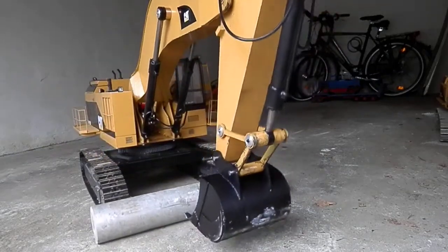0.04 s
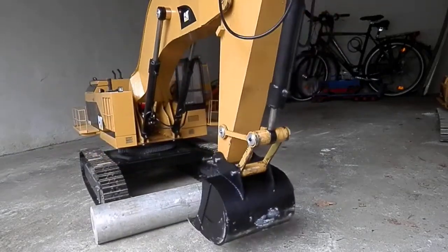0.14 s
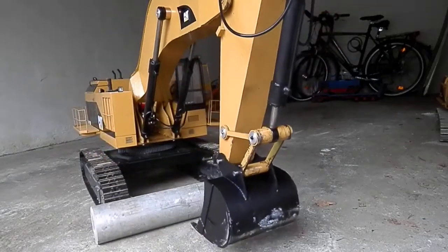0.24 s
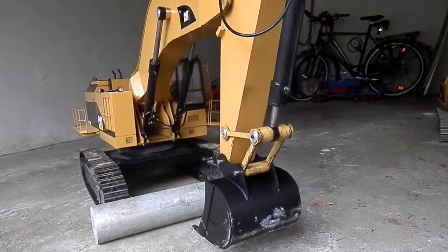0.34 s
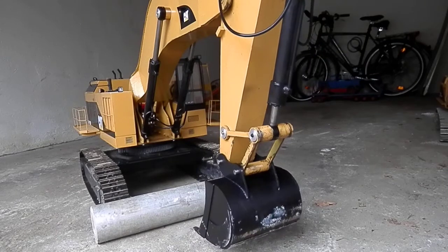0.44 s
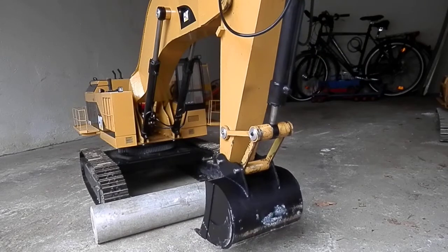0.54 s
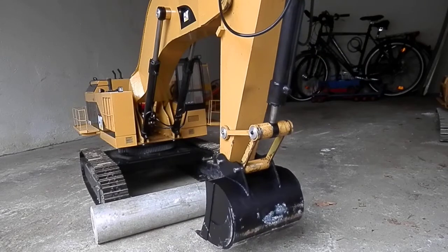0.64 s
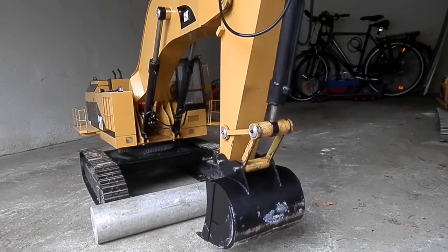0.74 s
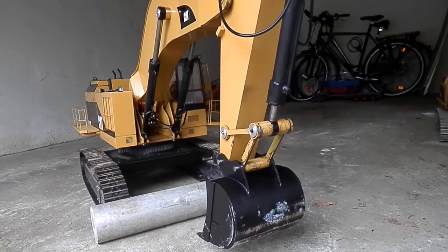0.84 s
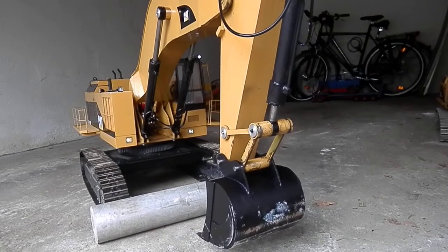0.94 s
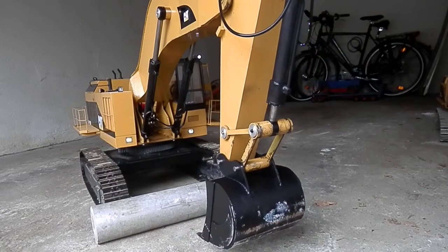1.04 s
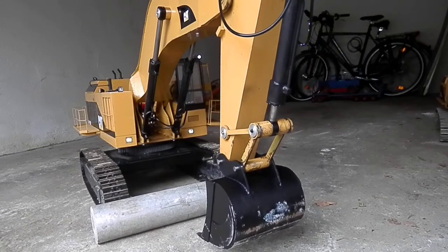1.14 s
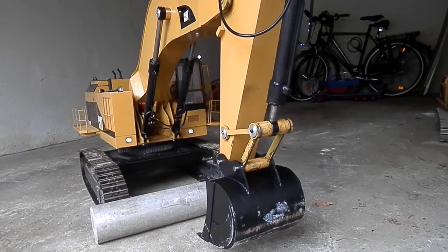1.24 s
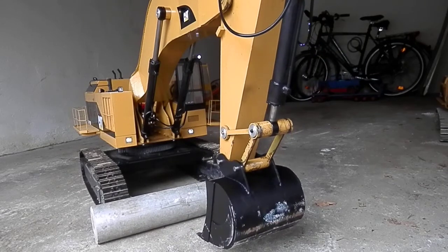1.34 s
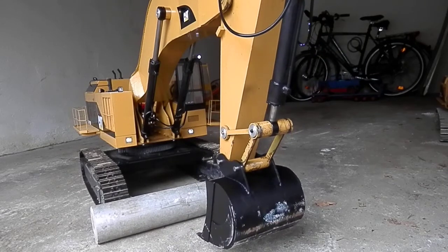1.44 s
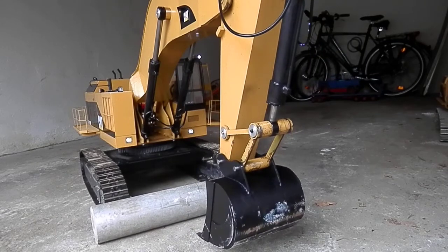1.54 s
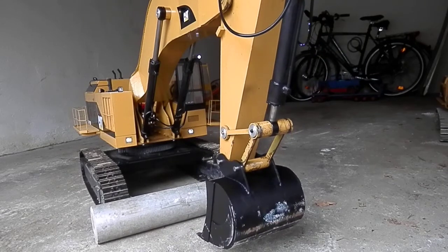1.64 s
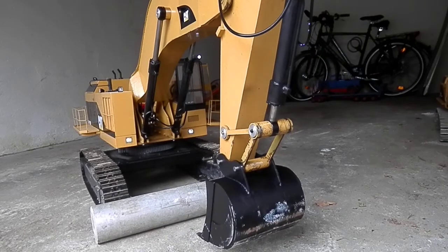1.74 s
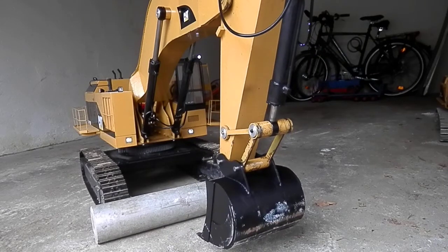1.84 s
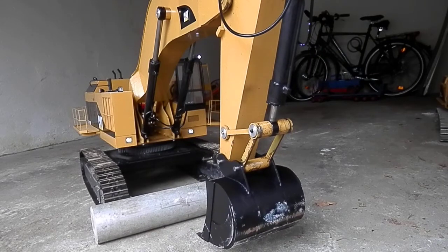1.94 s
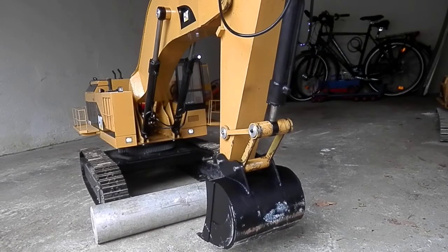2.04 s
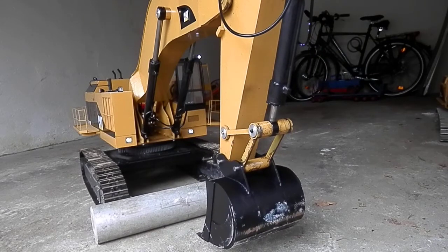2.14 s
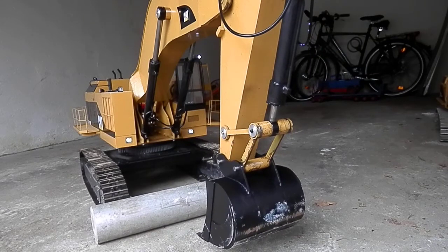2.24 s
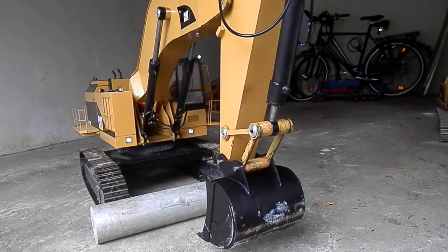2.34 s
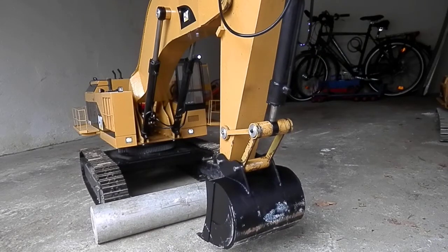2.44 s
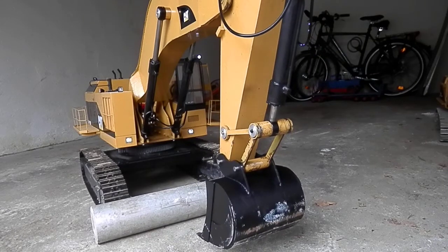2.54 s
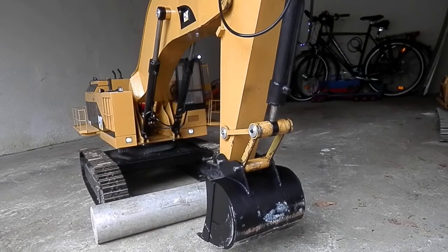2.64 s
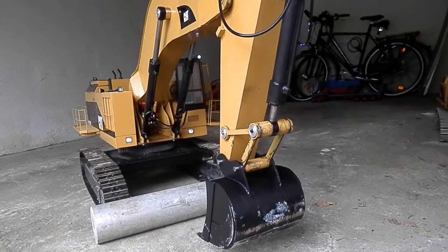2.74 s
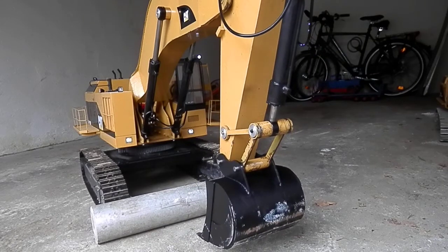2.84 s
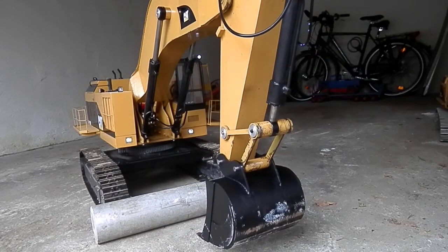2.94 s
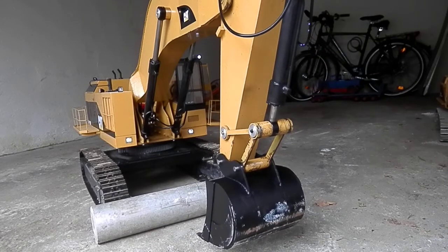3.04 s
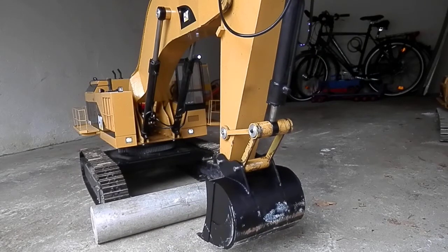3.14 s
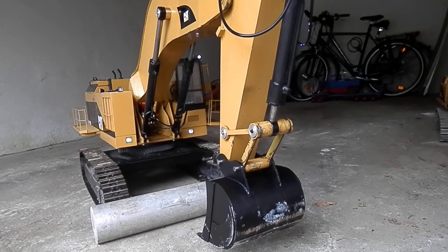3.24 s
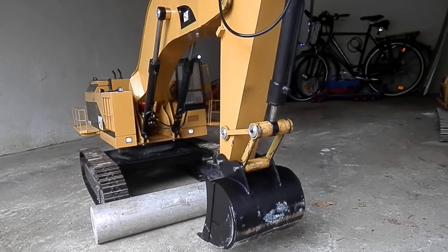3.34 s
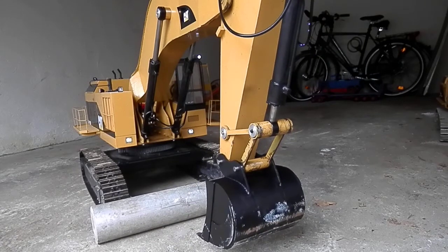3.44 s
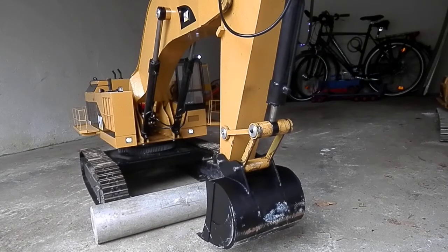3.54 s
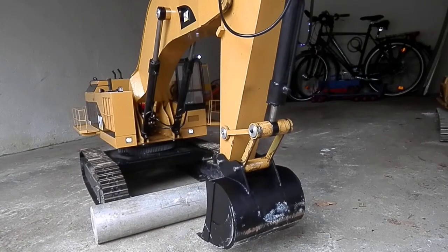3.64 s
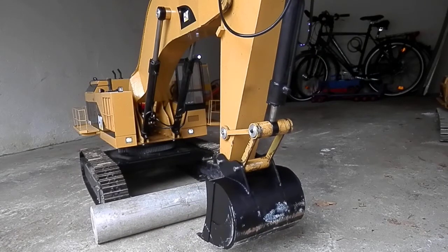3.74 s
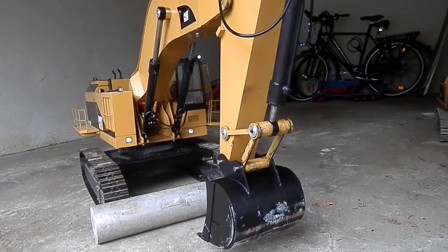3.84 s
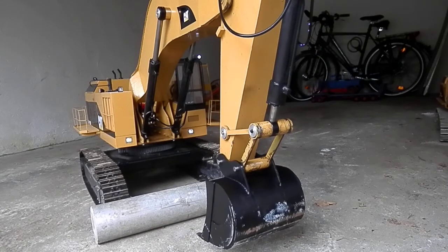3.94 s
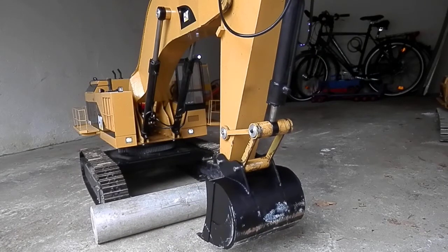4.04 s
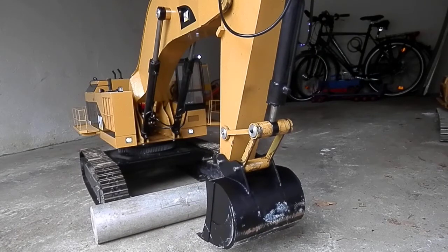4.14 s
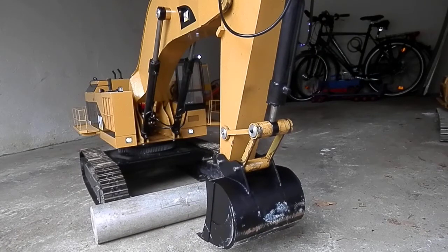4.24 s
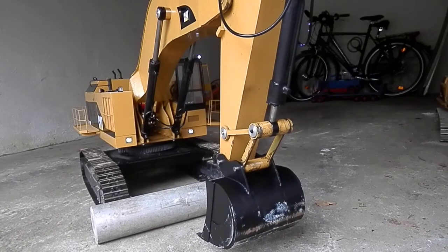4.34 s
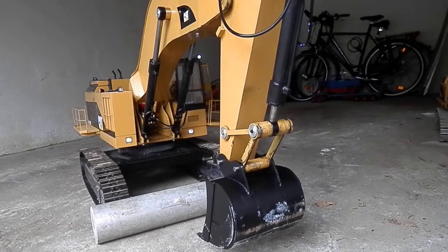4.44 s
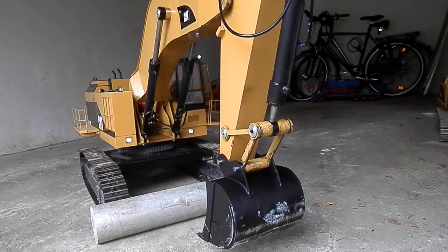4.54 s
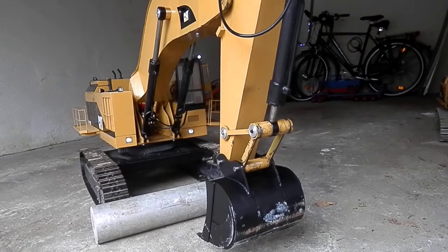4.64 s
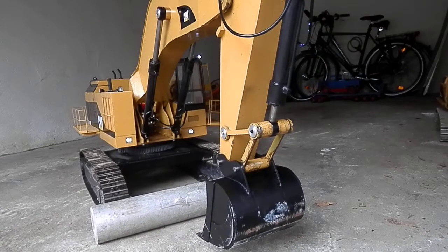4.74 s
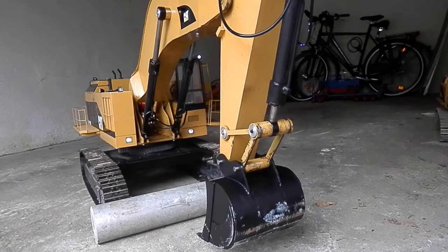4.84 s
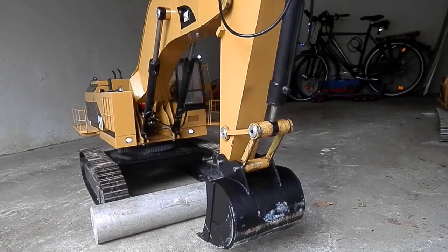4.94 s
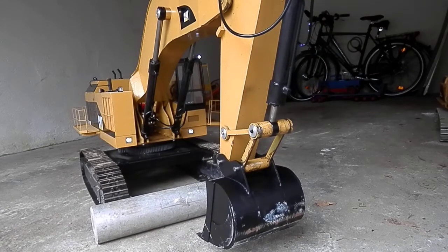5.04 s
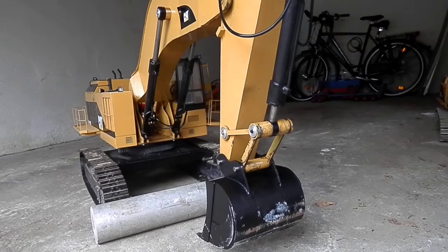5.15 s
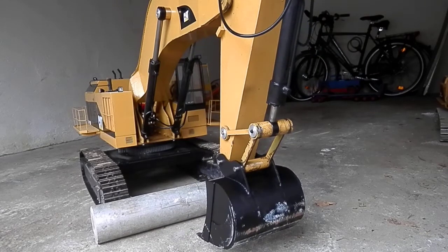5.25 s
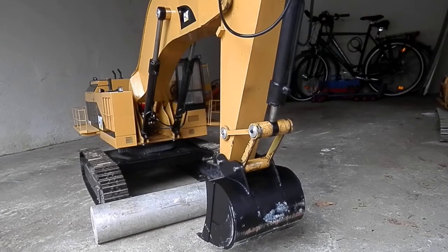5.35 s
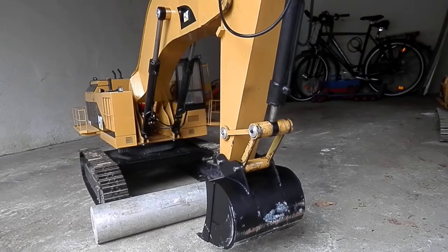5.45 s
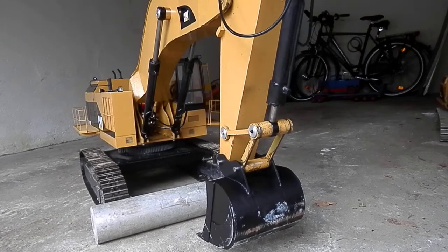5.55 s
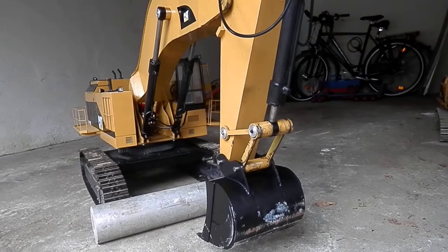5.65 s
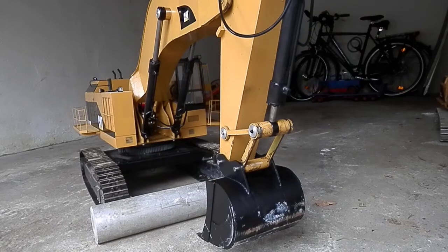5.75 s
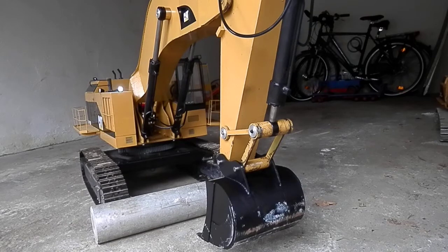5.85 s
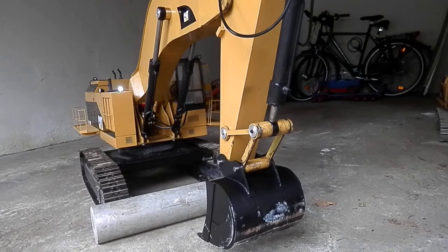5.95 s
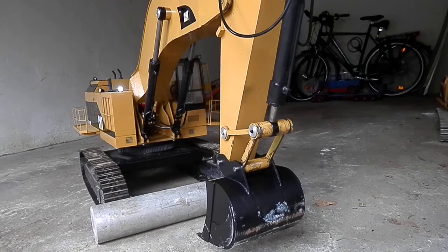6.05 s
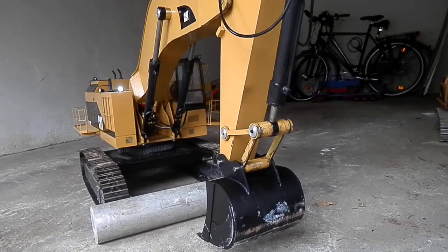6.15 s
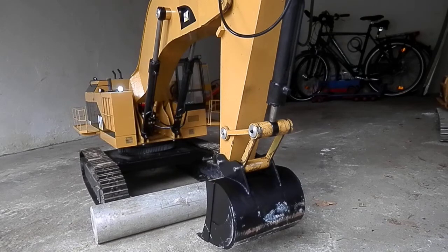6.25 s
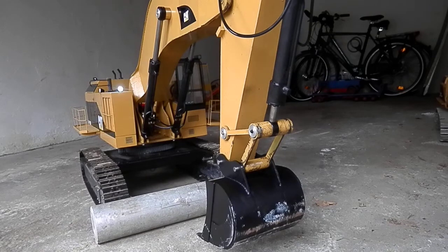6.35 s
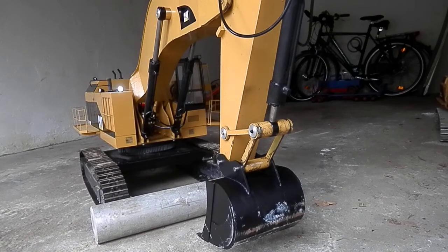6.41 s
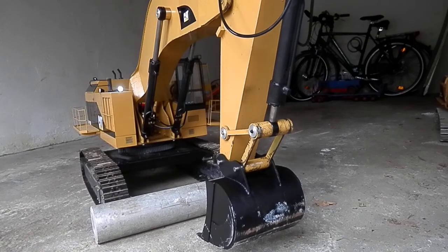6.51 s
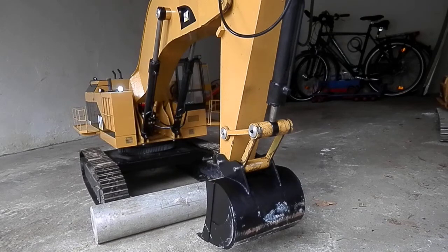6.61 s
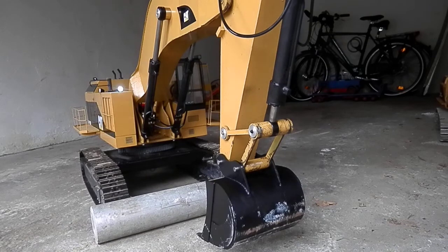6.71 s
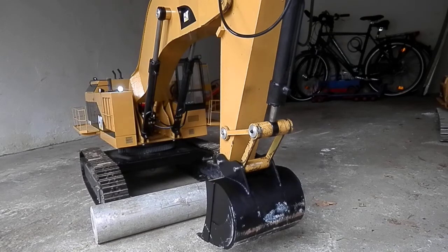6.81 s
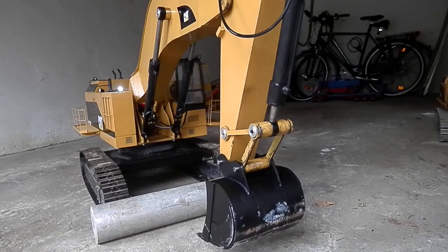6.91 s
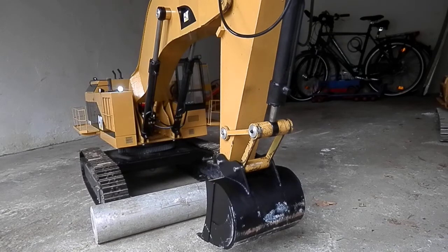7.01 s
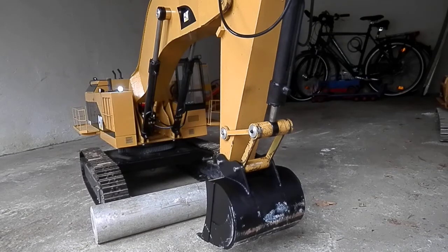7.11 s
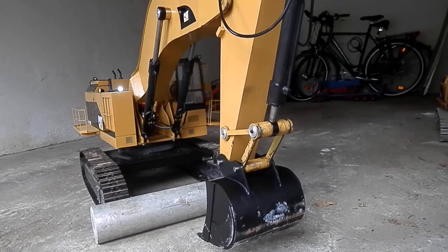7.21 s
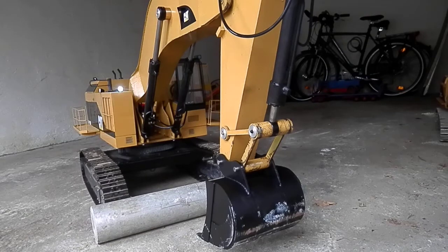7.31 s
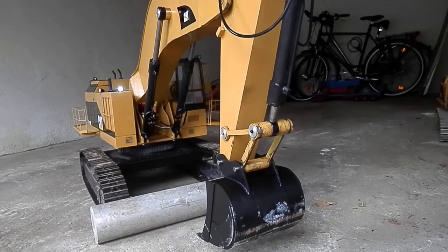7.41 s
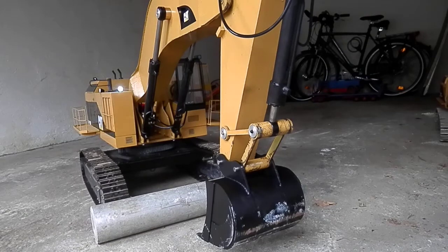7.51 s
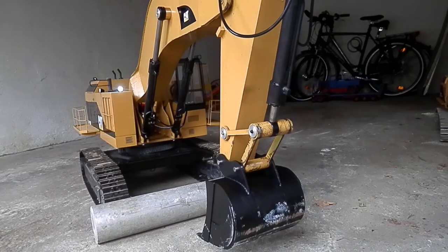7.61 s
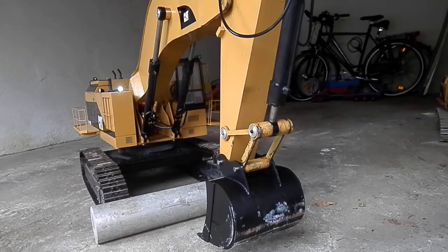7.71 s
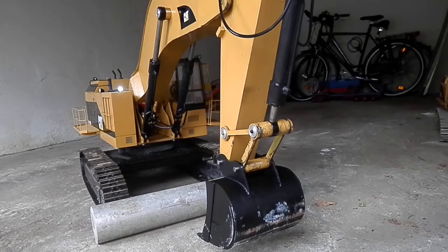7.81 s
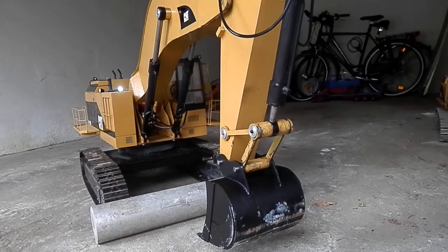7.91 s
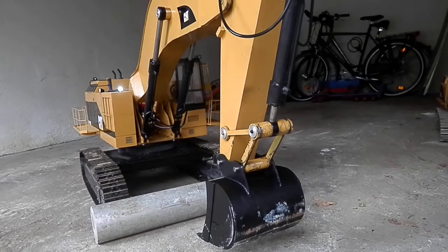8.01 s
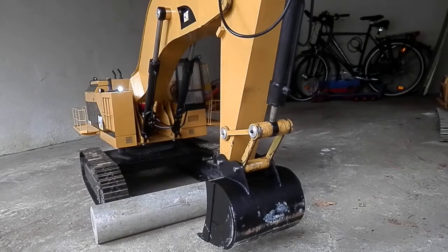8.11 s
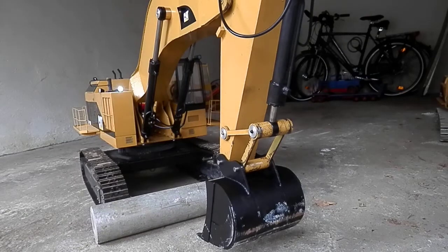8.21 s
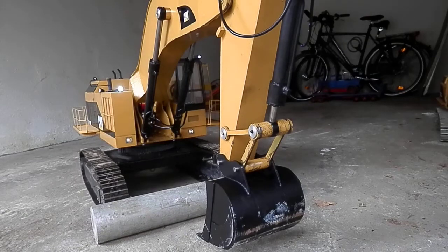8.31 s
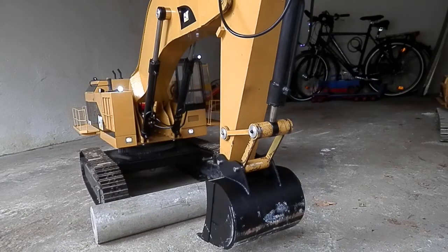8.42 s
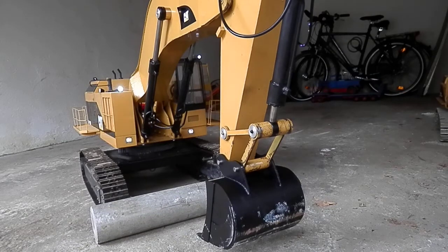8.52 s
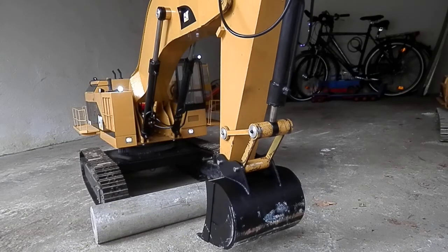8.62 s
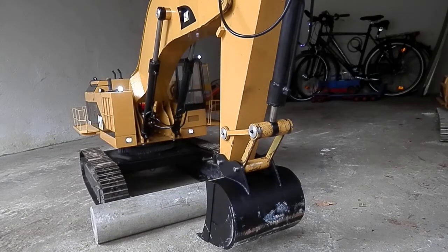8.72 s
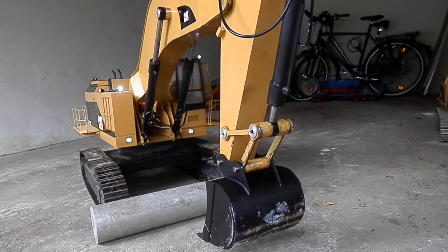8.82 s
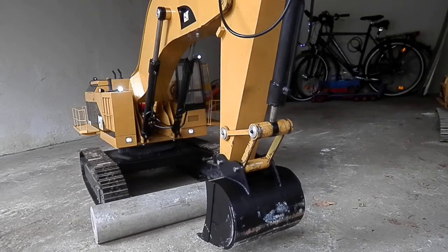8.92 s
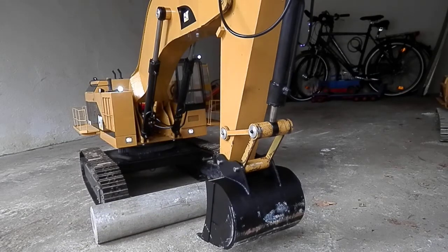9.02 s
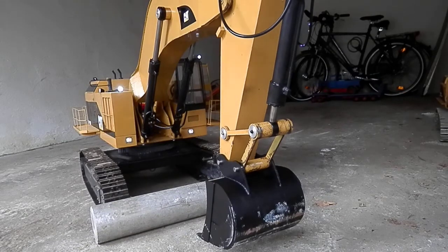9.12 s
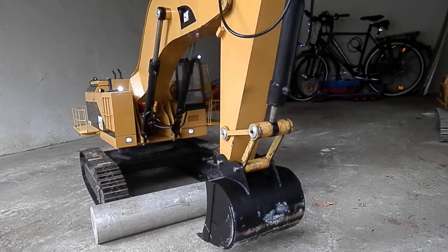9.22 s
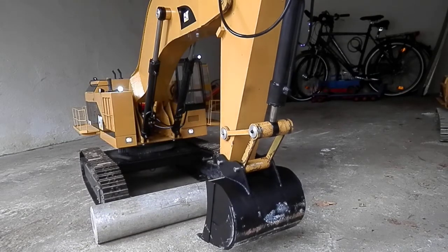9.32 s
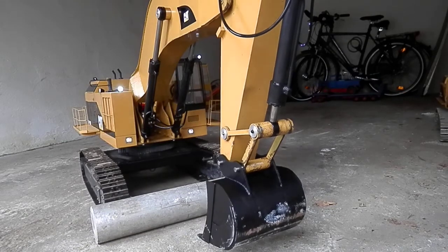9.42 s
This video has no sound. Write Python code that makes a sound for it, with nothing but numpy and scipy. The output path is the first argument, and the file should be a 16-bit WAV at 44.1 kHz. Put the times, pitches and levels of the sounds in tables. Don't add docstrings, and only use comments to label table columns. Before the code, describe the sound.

In a bare concrete garage, a model excavator's electric pump whines and rattles loudly, sags under load, rings hollowly and glides down to rest within two seconds. A small fan rises slightly in pitch and hums on steadily. Distant birds chirp faintly, then switches click and shoes scuff. A soft deep knock comes later, and controller hiss and a thin tone return at the end. Close microphone, light reverberation.

```python
import sys
import numpy as np
from scipy import signal
from scipy.fft import rfft, irfft, next_fast_len
from scipy.io import wavfile

SR = 44100
rng = np.random.default_rng(int(sys.argv[2]) if len(sys.argv) > 2 else 0)


def wav_out(sig):
    wavfile.write(sys.argv[1], SR, np.round(np.clip(np.atleast_2d(sig).T, -1, 1) * 32767).astype(np.int16))


def ratio(d):
    e = np.asarray(d, float) / 20
    return 10 ** e


N = 417627
TIME = np.arange(N) / SR
LOADED_HZ = 1043
FIELD = 1.088
WAKE_S, TURN_S = 9.14, 9.425
# (frequency [Hz], level [dB])
CAPSULE = [(300, 7.5), (2200, -2), (3700, -5), (5200, -4), (7200, 1), (9000, -1.5), (10500, -14.5),
           (12500, -15), (15200, -7.5)]


def in_time(rows):
    s, *columns = np.transpose(rows)
    return [np.interp(TIME, s, c) for c in columns]


def ramp(start_s, length_s):
    return np.clip((TIME - start_s) / length_s, 0, 1)


def rms_one(x):
    return x / np.sqrt(np.mean(x ** 2) + 1e-20)


def wander(rate_hz, size=N):
    r = np.exp(-2 * np.pi * rate_hz / SR)
    settle = 20000
    white = rng.standard_normal(size + settle)
    return rms_one(signal.lfilter([1], [1, -2 * r, r * r], white)[settle:])


def level_at(spectrum, at_hz):
    hz, db = np.transpose(spectrum)
    return np.interp(np.log(np.maximum(at_hz, 1)), np.log(hz), db)


def shaped(x, spectrum):
    size = next_fast_len(len(x))
    gain = ratio(level_at(spectrum, np.fft.rfftfreq(size, 1 / SR)))
    return irfft(rfft(x, size) * gain, size)[:len(x)]


def coloured(spectrum, size=N):
    return rms_one(shaped(rng.standard_normal(size), spectrum))


def resonate(x, hz, width_hz):
    r = np.exp(-np.pi * width_hz / SR)
    numerator = np.array([1, 0, -1]) * (1 - r * r) / 2
    return signal.lfilter(numerator, [1, -2 * r * np.cos(2 * np.pi * hz / SR), r * r], x)


def tone(hz, rough=0., rough_hz=60, flutter_db=0., flutter_hz=15):
    size = len(hz)
    phase = 2 * np.pi * (np.cumsum(hz) / SR + rng.random())
    skirt = wander(rough_hz, size) * np.sin(phase) + wander(rough_hz, size) * np.cos(phase)
    flutter = ratio(flutter_db * wander(flutter_hz, size))
    return flutter * (np.sqrt(2) * np.sin(phase) + rough * skirt)


def frame(x, through_db):
    # (frequency [Hz], width [Hz], level [dB])
    modes = [(795, 35, 1), (1090, 90, 0), (1480, 60, -1), (2090, 120, -6), (2420, 110, 1), (3900, 200, -10),
             (4400, 120, -5), (5600, 200, -7), (6600, 500, -12), (7500, 500, -8)]
    out = ratio(through_db) * x
    for k, (hz, width_hz, db) in enumerate(modes):
        out = out + (-1) ** k * ratio(db) * resonate(x, hz, width_hz)
    return out


def hush():
    # (frequency [Hz], density [dB per Hz])
    density = [(1200, -27.5), (2000, -6), (2500, -3.5), (2900, -10), (3500, -18), (4300, -10), (5250, -16),
               (6000, -10), (7300, -8), (8600, -16), (9300, -41.5), (12000, -42), (13400, -15.5),
               (15700, -8.5)]
    noise, edges = coloured(density), np.geomspace(1000, 16000, 15)
    out = np.zeros(N)
    for k, pair in enumerate(zip(edges, edges[1:])):
        band = signal.sosfilt(signal.butter(2, pair, "band", fs=SR, output="sos"), noise)
        out += (-1) ** k * band * ratio(1.1 * wander(3.5))
    return ratio(-74) * out


def birds():
    # (time [s], length [s], start frequency [Hz], end frequency [Hz], level [dB])
    calls = [(2.03, .12, 4400, 4380, -82), (2.13, .14, 4250, 4350, -81), (2.35, .07, 3900, 3950, -85),
             (2.54, .18, 4300, 4400, -78), (2.86, .05, 4210, 4200, -80), (2.95, .2, 4400, 4500, -81),
             (3.05, .2, 4650, 4700, -82), (4.2, .12, 7500, 7200, -85), (5.55, .13, 4500, 4500, -85),
             (5.88, .16, 5100, 5700, -86), (6.29, .12, 4550, 4600, -85), (6.9, .16, 4600, 4500, -81),
             (7.41, .09, 6500, 6950, -73), (7.62, .16, 6600, 6500, -77)]
    out = np.zeros(N)
    for s, length, start_hz, end_hz, db in calls:
        size, at = round(length * SR), round(s * SR)
        glide_hz = np.linspace(start_hz, end_hz, size)
        whistle = tone(glide_hz, rough=2.0, rough_hz=120, flutter_db=3.5)
        out[at:at + size] += ratio(db) * np.hanning(size) ** .4 * whistle
    return out


def fan():
    blades = 7
    # (time [s], blade rate [Hz])
    speed = [(0, 198.2), (1.3, 199.6), (1.8, 212.2), (2.08, 220.3), (2.3, 223.9), (2.64, 227.4),
             (3.5, 228.8), (7, 230.2)]
    # (frequency [Hz], level [dB])
    housing = [(211, -48), (216, -38.5), (220, -31), (224, -35.5), (228.5, -35), (230, -34.5)]
    # (multiple of the shaft rate, level [dB])
    shaft = [(1, -58), (2, -57.5), (4, -59), (6, -68), (8, -49.5), (10, -64.5), (14, -66), (16, -64.5),
             (21, -64), (33, -72)]
    # (frequency [Hz], density [dB per Hz])
    air = [(12, -53.5), (20, -20), (59, -9.5), (163, -22.5), (202, -14), (230, -11), (251, -15.5),
           (279, -13), (332, -19.5), (663, -24), (841, -34.5), (1070, -38), (1270, -43), (2130, -54.5),
           (3500, -61.5), (4550, -92.5), (7700, -120)]
    blade_hz, = in_time(speed)
    blade_db = level_at(housing, blade_hz)
    out = ratio(blade_db) * tone(blade_hz, rough=.12, rough_hz=6, flutter_db=.7, flutter_hz=1.5)
    for multiple, db in shaft:
        out += ratio(db) * tone(multiple * blade_hz / blades, rough=0.24, rough_hz=4.0)
    return out + ratio(-43.5 + 0.44 * wander(3.4)) * coloured(air)


def rings():
    # (time [s], frequency [Hz], peak level [dB], decay time T60 [s])
    blows = [
        (0, 277.6, -27, 0.48),
        (0, 1480, -28.5, 0.52),
        (1.2, 810, -22.5, .2),
        (0.64, 457.4, -21.5, .3),
        (.604, 533, -24, 0.16),
        (0.66, 685, -26, 0.089),
        (7.5, 350, -40, 0.068),
        (7.5, 69, -32.5, 0.71),
        (7.5, 120, -40, 0.36),
        (9.42, 542, -40, 0.3),
    ]
    out = np.zeros(N)
    for s, hz, db, t60 in blows:
        age = np.maximum(TIME - s, 0)
        onset = np.minimum(age * hz / 2.4, 1)
        out += ratio(db - 60 * age / t60) * onset * np.sin(2 * np.pi * hz * age)
    return out


def scuffs():
    # (time [s], length [s], level [dB], centre frequency [Hz], width [octaves])
    slides = [(4.982, 0.11, -54.5, 3940, 4.1), (5.082, .12, -55, 3860, 3.9),
              (5.387, 0.038, -50.5, 660, 0.79), (5.385, 0.085, -57, 3000, 4.9),
              (5.493, 0.026, -58.5, 3500, 2.0), (5.522, .07, -66, 1800, 6.1),
              (6.455, 0.018, -54, 1090, 0.98), (5.02, 0.17, -63, 2380, 0.69), (5.754, .05, -70, 7500, 0.81),
              (7.508, 0.043, -39.5, 583, 0.98), (7.51, 0.082, -50, 3992, 12), (7.57, 0.053, -60, 580, 0.74),
              (7.866, 0.016, -50.5, 500, 1.1), (7.87, .03, -61.5, 5203, 1.0),
              (7.972, 0.065, -66, 2570, 2.6), (8.284, 0.051, -63.5, 6500, 3.2),
              (8.725, 0.028, -57, 586, 2.2), (8.74, .1, -67.5, 7370, 1)]
    out, size = np.zeros(N), 2 ** 13
    for s, length, db, hz, octaves in slides:
        age = TIME[:size] / length
        shape = np.minimum(age / .12, 1) * ratio(-25 * np.maximum(age - .7, 0))
        band = [(hz / 16 ** octaves, -48), (hz, 0), (hz * 16 ** octaves, -48)]
        at = round(s * SR)
        out[at:at + size] += ratio(db + 3.2 * wander(120, size)) * shape * coloured(band, size)
    return out


def clicks():
    # (time [s], peak level [dB], pitch [Hz], share of 500-1500 Hz [dB])
    taps = [(4.9876, -44.5, 6900, -4), (5.2928, -40, 6750, -4), (5.3781, -43.5, 1910, 7.5),
            (5.4285, -43, 1820, -1), (5.4934, -32.5, 1950, -11), (5.5164, -49, 1930, -13.5),
            (5.66, -53, 2060, 8), (5.7682, -39.5, 6820, -9), (6.039, -35.5, 6770, -9.5),
            (7.5058, -39, 1910, 4.5), (7.5454, -47, 6060, 7.5), (7.874, -48, 1990, -3),
            (7.955, -38.5, 2200, -14), (8.234, -50, 7180, -2), (8.263, -44, 2580, -6.5),
            (8.574, -46, 5400, 0), (8.732, -41, 8040, -5), (8.9892, -51, 1810, 6), (9.1425, -47, 3860, 5),
            (9.1833, -49, 2480, 20)]
    out, age = np.zeros(N), TIME[:2000]
    for s, db, hz, low_db in taps:
        burst = rng.standard_normal(len(age)) * np.minimum(age / .005, 1) * ratio(-60 * age / .035)
        bright = resonate(burst, hz, 1900) + ratio(-11) * burst
        dull = ratio(low_db - 9.5) * rms_one(resonate(burst, 900, 900))
        at = round(s * SR)
        out[at:at + len(age)] += ratio(db - 20.5) * (rms_one(bright) + dull)
    return out


def tooth_rate():
    # (time [s], drop [Hz])
    load_steps = [
        (.65, 9),
        (.8, 15),
        (.88, 13.5),
    ]
    release_s, creep_hz = 1.078, 90
    hz = LOADED_HZ + 181 * (1 - ramp(0, .5)) ** 1.8
    hz = hz - sum(drop * ramp(s, .04) for s, drop in load_steps)
    free = np.maximum(TIME - release_s, 0)
    hz = hz - 974 * free - 943 * free ** 2
    return creep_hz * np.logaddexp(0, hz / creep_hz) + 1


def chopper_levels():
    # (pulling level [dB], braking level [dB], restarting level [dB])
    lines = [(-45, -47, -64), (-47, -39, -54), (-60, -48, -56), (-78.5, -64, -71.5)]
    brake_s, brake_rise_s, sleep_s = 1.12, .08, 1.62
    brake = ramp(brake_s, brake_rise_s)
    slowed = np.clip(1 - tooth_rate() / LOADED_HZ, 0, 1)
    kick_db = 10.5 * brake * np.exp(-np.maximum(TIME - brake_s - brake_rise_s, 0) / .07)
    fade_db = 149 * np.maximum(TIME - sleep_s, 0)
    shares, backs = [brake, brake, brake, slowed], [TURN_S, TURN_S, TURN_S, WAKE_S]
    gains = []
    for (pull, hold, again), share, back in zip(lines, shares, backs):
        gains.append(ratio(pull + (hold - pull) * share - fade_db) + ratio(again) * ramp(back, .02))
    gains[0] = gains[0] * ratio(kick_db)
    return gains, slowed


def controller():
    (middle, low, high, octave), slowed = chopper_levels()
    first, awake = TIME < 5, ramp(WAKE_S, .02)
    chop_hz = np.where(first, 7780 + 66 * slowed, 7830)
    restart_field_hz = 3400 * np.maximum(TIME - TURN_S, 0)
    field_hz = np.where(first, FIELD * tooth_rate(), restart_field_hz)
    out = middle * tone(chop_hz, rough=0.17, flutter_db=3.5)
    out += low * tone(chop_hz - field_hz, rough=0.2, flutter_db=4)
    out += high * tone(chop_hz + field_hz, rough=0.11, flutter_db=2)
    out += octave * tone(2 * chop_hz - 60, rough=2.2, rough_hz=110)

    coil_s, coil_hz = 1.48, 4390
    coil = ratio(-52.5 - 42 * (TIME - coil_s)) * ramp(coil_s, .03) * (1 - ramp(1.86, .03))
    coil = coil + ratio(-75) * awake
    out += coil * tone(np.full(N, coil_hz), rough=0.58)

    swell = np.exp(-np.maximum(TIME - WAKE_S, 0) / .1)
    hiss = awake * ratio(-48.5 - 13.5 * swell)
    noise = frame(coloured([(400, 4.5), (1500, -4.5), (8000, -11.5)]), through_db=-4)
    return out + hiss * rms_one(shaped(noise, CAPSULE))


def pump():
    # (multiple of the tooth rate, level [dB])
    teeth = [(1, 2), (2, -1), (3, -8), (4, 1), (6.05, -7), (7.1, -11), (8.05, -14), (1.8, -9), (4.53, -7),
             (1.2, -9)]
    # (multiple of the field rate, level [dB])
    poles = [(1, -43), (2, -44), (3, -34), (6, -32)]
    # (frequency [Hz], density [dB per Hz])
    rattle_density = [(88, -44), (150, -20), (222, -10.5), (689, -11.5), (1100, -3), (1690, -10.5),
                      (2100, -1.5), (2650, -13), (3550, -16), (4000, -3), (4860, -16.5), (5680, -3.5),
                      (7770, -10.5), (10200, -28.5), (16000, -33.5)]
    # (time [s], rattle level [dB])
    effort = [(0, -29), (.3, -31), (1.0, -33), (1.12, -29), (1.28, -36), (1.45, -35), (1.75, -46.5),
              (1.93, -64.5), (2.0, -150)]
    # (frequency [Hz], level [dB])
    upper_case = [(3400, -55), (4250, -32), (4570, -19), (4950, -33), (5350, -55.5), (5640, -24),
                  (5950, -26), (6900, -36.5)]
    # (frequency [Hz], level [dB])
    lower_case = [(3500, -66), (3950, -32), (4200, -14.5), (4550, -27.5), (4950, -31.5), (5200, -23),
                  (5500, -25), (6400, -51)]
    upper, lower = 5.665, 5.21
    size = 2 * SR
    teeth_hz, rattle_db = tooth_rate()[:size], in_time(effort)[0][:size]
    octaves = np.log2(teeth_hz / LOADED_HZ)
    upper_db = level_at(upper_case, upper * teeth_hz) + 12 * octaves
    lower_db = level_at(lower_case, lower * teeth_hz) + 12 * octaves
    teeth_db = -33.5 + 13 * octaves
    teeth_hz = teeth_hz * (1 + .002 * wander(22, size))

    out = ratio(upper_db) * tone(upper * teeth_hz, rough=.3, rough_hz=60, flutter_db=2.5, flutter_hz=18)
    out += ratio(lower_db) * tone(lower * teeth_hz, rough=.3, rough_hz=60, flutter_db=2.5, flutter_hz=18)
    for multiple, db in teeth:
        hz = multiple * teeth_hz
        casing_db = .55 * level_at(rattle_density, hz)
        partial = tone(hz, rough=.45, rough_hz=45, flutter_db=1.8, flutter_hz=20)
        out += ratio(teeth_db + db + casing_db) * partial

    force = sum(ratio(db) * tone(multiple * FIELD * teeth_hz, rough=.2) for multiple, db in poles)
    out += frame(frame(force * ratio(rattle_db + 38), through_db=-40), through_db=-40)

    rattle = coloured(rattle_density, size) * ratio(1.9 * wander(66, size))
    dull = signal.lfilter(*signal.butter(1, 2500, fs=SR), rattle)
    bright = np.clip(teeth_hz / 700, .35, 1)
    rattle = dull + bright * (rattle - dull)
    out += ratio(rattle_db) * rms_one(rattle + ratio(-3.0) * frame(rattle, through_db=-63))
    return np.pad(out, (0, N - size))


def garage(x):
    t60_s, cut_hz = .42, 8000
    age = TIME[:SR // 2]
    white = rng.standard_normal(len(age))
    dull = signal.lfilter(*signal.butter(1, cut_hz, fs=SR), white)
    tail = dull * ratio(-60 * age / t60_s) + (white - dull) * ratio(-100 * age / t60_s)
    tail = tail * (age > .006)
    return signal.fftconvolve(x, tail / np.sqrt(np.sum(tail ** 2)))[:N]


def scene():
    far, hollow = birds(), rings()
    small = shaped(clicks() + scuffs(), CAPSULE)
    machine = pump() + controller()
    wet = garage(ratio(-7) * far + ratio(-7.0) * machine + ratio(-3.5) * small + ratio(-8) * hollow)
    return (machine + small + hollow + wet + fan() + hush() + ratio(-4.0) * far)[None]


def roll_off(x):
    return signal.sosfilt(signal.butter(12, 16150, fs=SR, output="sos"), x)


def record(dry):
    # (frequency [Hz], level [dB])
    band_top = [(15690, 0), (15740, -40)]
    mix = shaped(dry[0], band_top)[None]
    return roll_off(mix)


dry = scene()
out = record(dry)
wav_out(out)
```